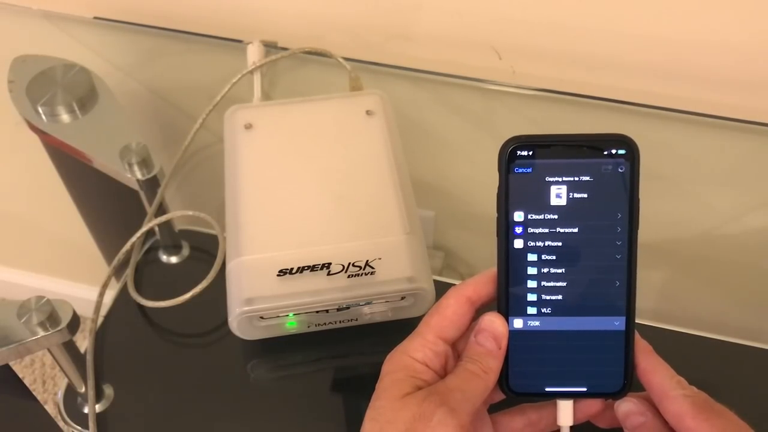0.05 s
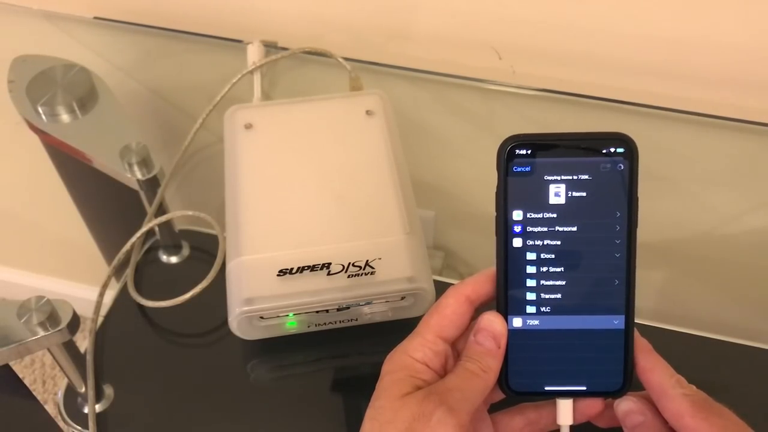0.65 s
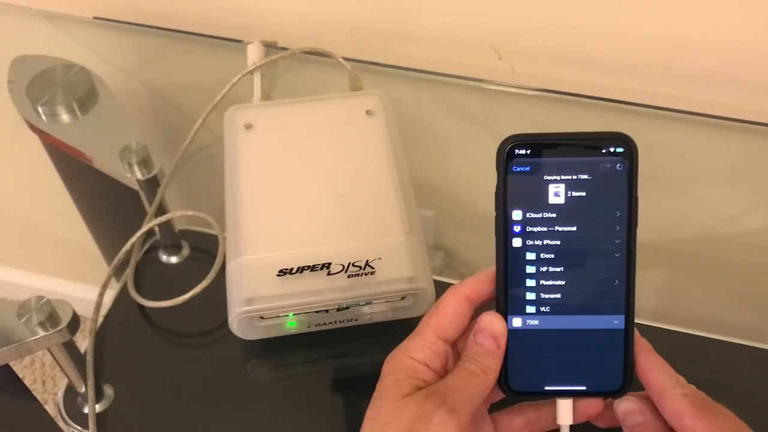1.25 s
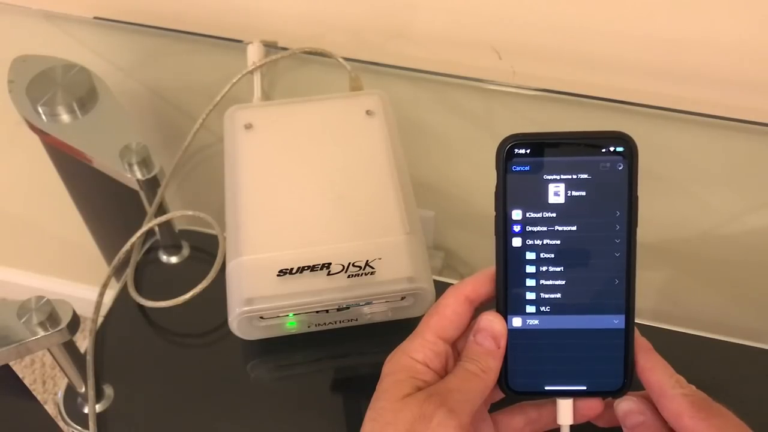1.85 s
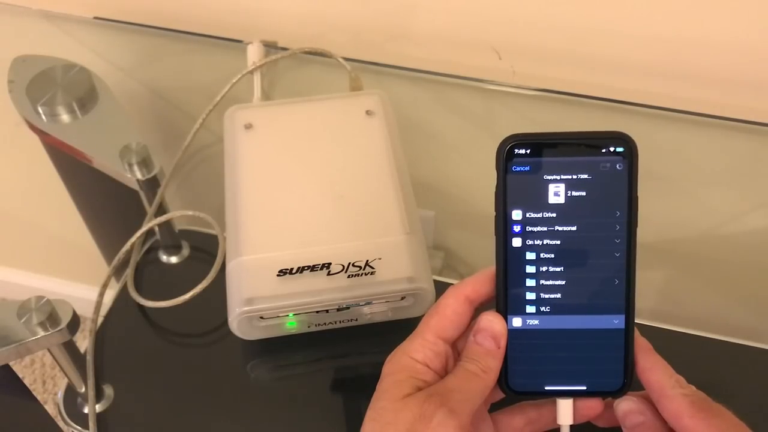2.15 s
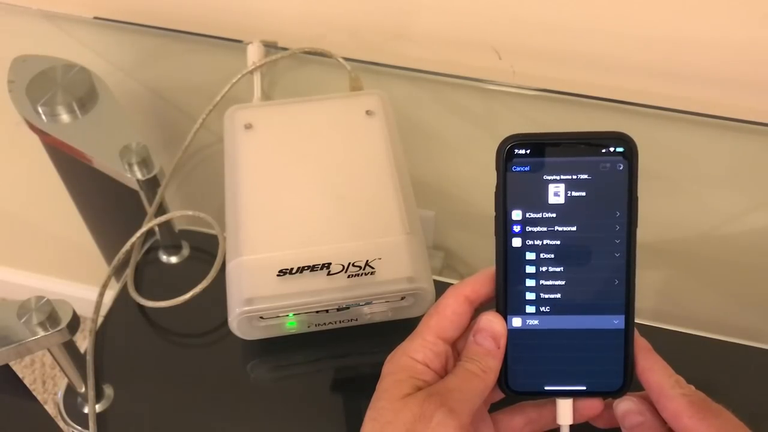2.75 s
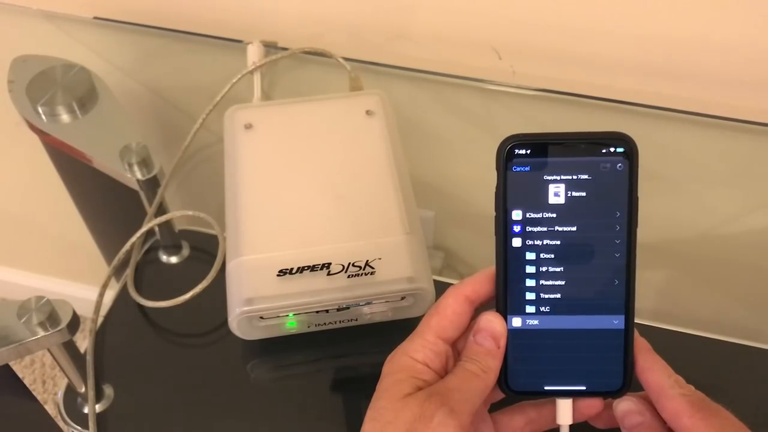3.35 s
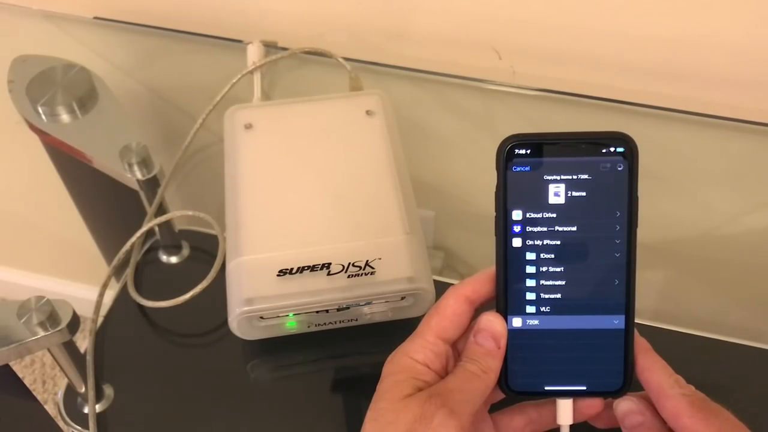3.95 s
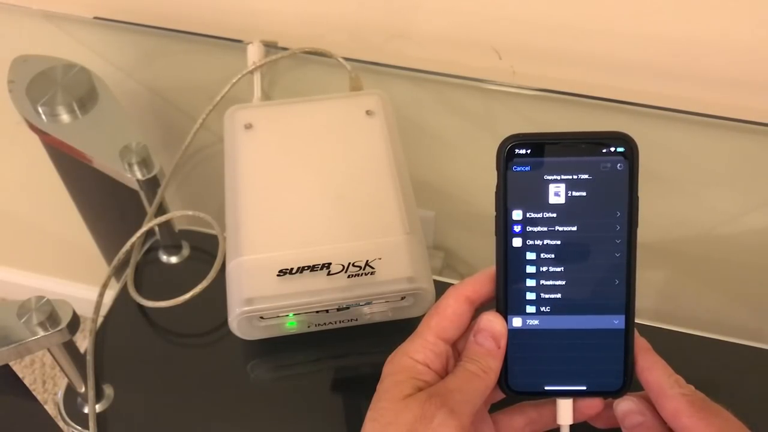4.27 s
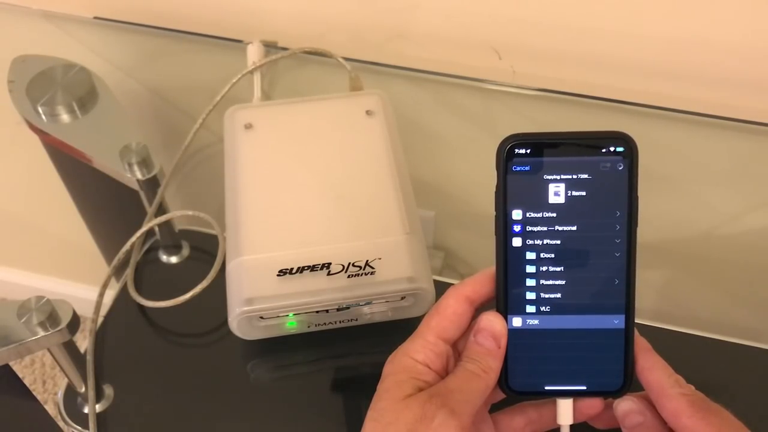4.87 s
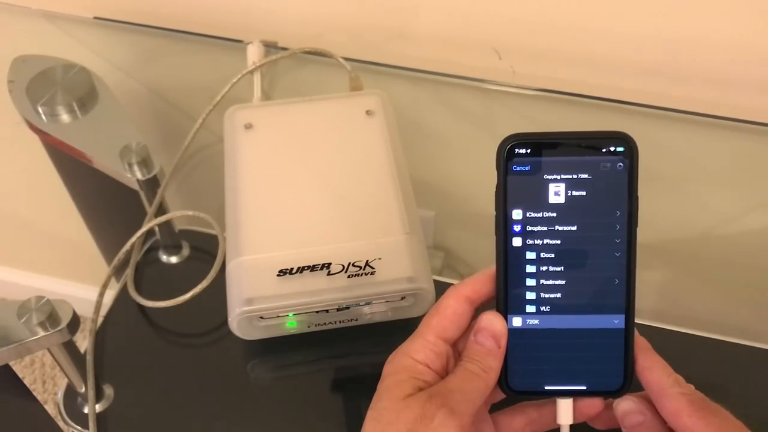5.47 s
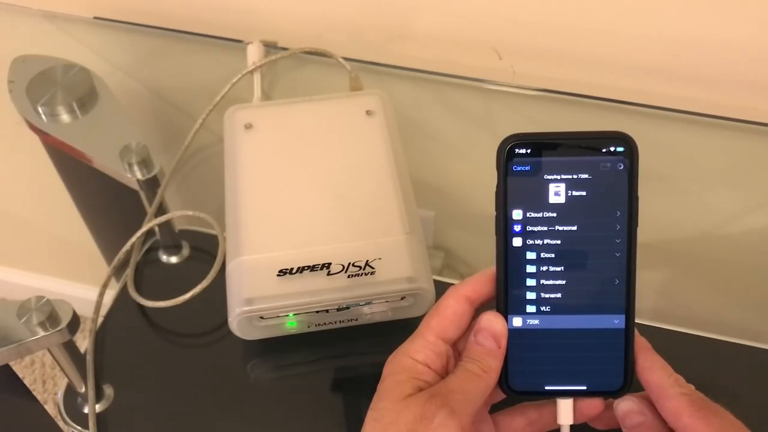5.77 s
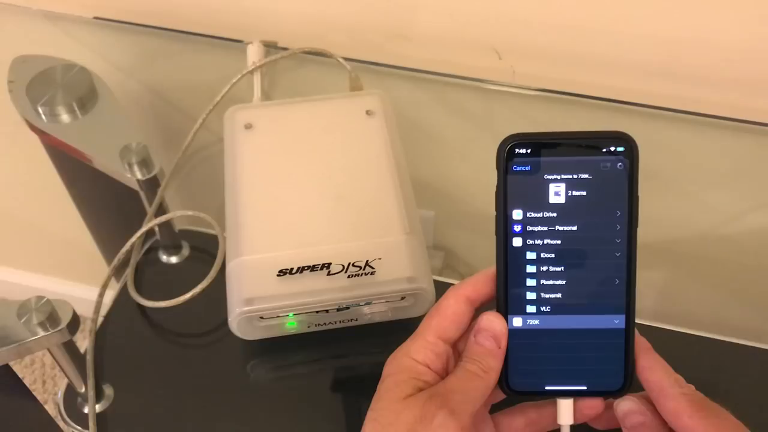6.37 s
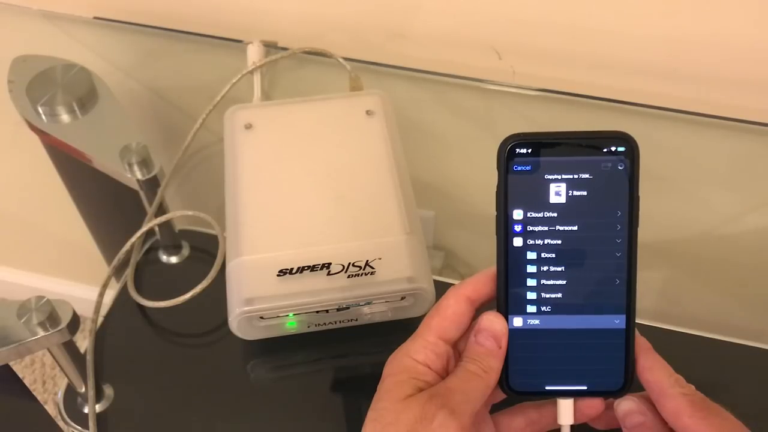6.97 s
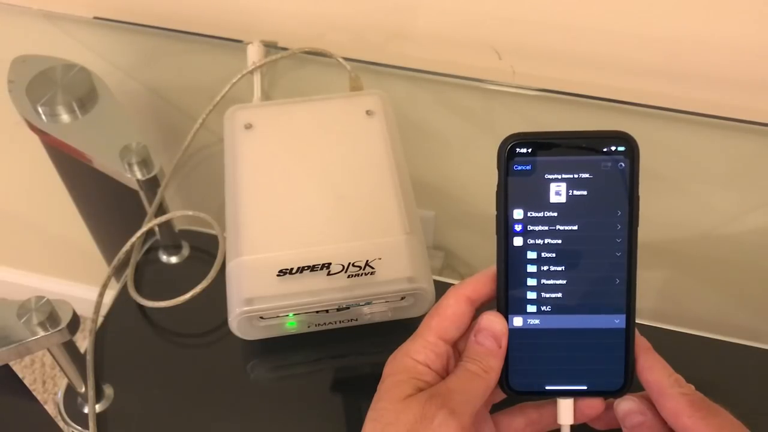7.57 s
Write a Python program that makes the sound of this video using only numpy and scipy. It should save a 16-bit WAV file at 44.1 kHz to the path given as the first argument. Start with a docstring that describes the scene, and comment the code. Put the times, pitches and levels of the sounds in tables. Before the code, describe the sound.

A floppy disk drive writes, its head stepping in quick, even scraping pulses over a whirring disk and low hum.

```python
"""Floppy drive writing

An external floppy drive writes to a disk on a desk in a small room. Low room rumble and mains hum
lie under thin motor tones and the frictional whirr of the spinning disk. The head carriage steps in
even runs, twelve times a second, broken by harder seeks and small corrections. Each move scrapes,
excites the modes of its metal frame and makes the servo sing; in some stretches fine ticks stand out."""
import sys
import numpy as np
from scipy import signal
from scipy.fft import rfft, irfft
from scipy.io import wavfile
from scipy.ndimage import uniform_filter1d

SR = 44100
rng = np.random.default_rng(int(sys.argv[2]) if len(sys.argv) > 2 else 0)


def store_wav(level_fs):
    """Save 16-bit WAV to argv[1]."""
    pcm = np.round(np.clip(np.atleast_2d(level_fs), -1, 1) * 32767)
    wavfile.write(sys.argv[1], SR, pcm.T.astype(np.int16))


N = 340452
T = np.arange(N) / SR
FREQ = np.maximum(np.arange(N // 2 + 1) * SR / N, 1)


def undb(db):
    """Amplitude ratio of a level in decibels."""
    return 10 ** (np.asarray(db) / 20)


def white_noise():
    """Gaussian noise with a flat spectral density of 0 dB per Hz."""
    return rng.standard_normal(N) * np.sqrt(SR / 2)


def drift(rate_hz):
    """Slow random modulation of unit variance: held values, smoothed twice."""
    hold = max(int(SR / rate_hz), 1)
    held = rng.standard_normal(N)[np.arange(N) // hold]
    smooth = uniform_filter1d(uniform_filter1d(held, hold), hold)
    return smooth / smooth.std()


def colour(x, spectrum, peaks):
    """Spectral shaping: a smooth envelope with Lorentzian resonance peaks on top."""
    hz, db = np.transpose(spectrum)
    gain_db = np.interp(np.log(FREQ), np.log(hz), db)
    gain_db += sum(lift / (1 + (2 * (FREQ - f) / width) ** 2) for f, width, lift in peaks)
    return irfft(rfft(x) * undb(gain_db), N)


def ring(x, modes, reach):
    """Modal superposition: each damped mode radiates through a band of relative width `reach`."""
    def band(f, width):
        return 1 / (1 + 1j * (FREQ ** 2 - f ** 2) / (FREQ * width))
    response = sum(undb(db) * band(f, width) * band(f, reach * f) for f, width, db in modes)
    return irfft(rfft(x) * response, N)


def reverberate(x, t60_s, wet_db):
    """Reverberation: dense reflections from desk and walls decay exponentially."""
    t = T[:SR // 3]
    tail = rng.standard_normal(len(t)) * undb(-60 * t / t60_s) * (t > .003)
    return x + undb(wet_db) * signal.fftconvolve(x, tail / np.linalg.norm(tail))[:N]


# Spectral envelope of the rumble: frequency_hz, density_db
RUMBLE_SPECTRUM = [(10, -112), (22, -99), (32, -88), (45, -82.5), (65, -69.5), (105, -65.5), (148, -69.5),
                   (185, -71), (240, -76.5), (330, -83.5), (520, -86.5), (900, -100), (2000, -125)]
# Standing waves of the room: frequency_hz, bandwidth_hz, lift_db
ROOM_RESONANCES = [(67, 23, 1.9), (98.4, 9.7, 7.2), (136.7, 9.8, 2.4), (165.8, 9.4, 11.8),
                   (229.7, 3.7, 6.8), (263, 5.6, 4.1), (319, 7.4, 3.4)]

def room_rumble():
    """Standing waves reinforce low broadband noise at the room's natural frequencies."""
    return colour(white_noise(), RUMBLE_SPECTRUM, ROOM_RESONANCES)


# Harmonics of the hum, from the fundamental up: level_db
HUM_HARMONICS = [-38, -66, -73.5]

def mains_hum(pitch_hz, waver_db):
    """Periodic vibration at twice the mains frequency gives a nearly steady harmonic series."""
    tones = sum(undb(db) * np.sin(2 * np.pi * (k * pitch_hz * T + rng.random()))
                for k, db in enumerate(HUM_HARMONICS, 1))
    return np.sqrt(2) * tones * undb(waver_db * drift(3.97))


# Partials of the motor: pitch_hz, level_db
MOTOR_PARTIALS = [(259.3, -62), (505, -78.5), (890, -77), (960, -78.5), (969, -74.5), (1019, -79),
                  (1297.5, -77.5), (1418, -89), (1589, -77.5), (1730, -79.5), (1801, -81.5), (1947, -75),
                  (2260, -91), (4544, -94)]

def motor_whine(wow, waver_db):
    """Frequency modulation: speed drift bends all partials together; each wavers in level alone."""
    shaft_time = T + wow * np.cumsum(drift(4)) / SR
    tones = sum(undb(db + waver_db * drift(6)) * np.sin(2 * np.pi * (hz * shaft_time + rng.random()))
                for hz, db in MOTOR_PARTIALS)
    return np.sqrt(2) * tones


# Spectral envelope of the disk rubbing in its jacket: frequency_hz, density_db
WHIRR_SPECTRUM = [(200, -105), (600, -91.5), (900, -93), (1450, -94), (1900, -95), (2150, -96.5),
                  (2800, -100), (3500, -105), (5600, -111), (8200, -112.5), (10500, -118.5),
                  (13500, -121.5)]
# Resonances of the case: frequency_hz, bandwidth_hz, lift_db
CASE_RESONANCES = [(564, 23, 9.1), (617, 23, 4.5), (730, 110, 2.8), (845, 12, 5.5), (912, 37, 6),
                   (974, 26, 3.4), (1130, 21, 2.9), (1298, 30, 5.6), (1605, 41, 8.6), (1740, 20, 6.2),
                   (1840, 21, 6.4), (1905, 30, 5), (2460, 86, 4.4), (2560, 56, 4.5), (3130, 51, 3.5),
                   (5120, 110, 2.5), (7160, 180, 6)]

def disk_whirr(turn_hz, swell_db, flicker_db):
    """Sliding friction: the disk brushes its liner, a little harder once in each turn."""
    rub_db = swell_db * np.sin(2 * np.pi * turn_hz * T) + flicker_db * drift(25)
    return colour(white_noise() * undb(rub_db), WHIRR_SPECTRUM, CASE_RESONANCES)


# Runs of even head steps: start_s, end_s, strength_db, step_length_s
STEP_RUNS = [(0.024, 0.89, 1, 0.025), (1.076, 1.37, 1, 0.055), (1.562, 1.69, 1.5, 0.053),
             (1.794, 2.17, 0, .045), (2.226, 3.43, 0.5, 0.037), (3.452, 3.91, 1.5, 0.056),
             (4.515, 4.72, 2, .075), (4.743, 5.20, 2, .072), (6.555, 6.70, 3.5, .08),
             (6.779, 7.06, 2, .072), (7.413, 7.70, 1.5, 0.073)]
# Single harder seeks: start_s, strength_db, length_s
SINGLE_SEEKS = [(0.111, 2.5, 0.02), (0.528, 2, .04), (0.765, 2.5, .033), (0.969, 3.5, 0.019),
                (1.386, 1.5, .022), (1.425, 1.5, .008), (1.524, 1, 0.007), (2.225, 2.5, .025),
                (2.646, 3.5, 0.044), (3.165, 4.5, 0.011), (3.926, 3.5, 0.06), (4.011, 1.5, .05),
                (4.194, 2, 0.06), (4.328, 1, 0.054), (4.403, 2, 0.0074), (4.681, 3.5, .075),
                (5.215, 2.5, 0.049), (5.346, 2.5, .018), (5.435, 0.5, .06), (5.615, 3, 0.024),
                (5.860, -0.5, 0.055), (6.025, 1.5, .022), (6.064, 1.5, 0.011), (6.243, 2.5, .012),
                (6.351, 3, 0.02), (6.428, 3.5, 0.032), (7.086, 2, .022), (7.22, 2.5, 0.024),
                (7.341, 3.5, 0.015), (7.619, 3.5, 0.024)]

def head_moves(period_s, scatter_db):
    """Periodic steps of slightly unequal strength, plus isolated seeks, as (start_s, db, length_s)."""
    deviations = rng.standard_normal(size=(len(STEP_RUNS), 40))
    steps = [(start, db + scatter_db * deviation, length)
             for (first, end, db, length), row in zip(STEP_RUNS, deviations)
             for start, deviation in zip(np.arange(first, end, period_s), row)]
    return steps + SINGLE_SEEKS


def corrections(rate_hz, strength_db, scatter_db, length_s):
    """A jittered pulse train: one brief move at a random moment in each slot of time."""
    slots = 400
    starts = (np.arange(slots) + rng.random(size=slots)) / rate_hz
    strengths = strength_db + scatter_db * rng.standard_normal(size=slots)
    return [(start, db, length_s) for start, db in zip(starts, strengths) if start < T[-1]]


def stroke(length_s, rise_s=.00053, coast_s=.061, brake_s=.0058):
    """Damped motion: the speed of one move rises sharply, decays, and is braked after length_s."""
    t = T[:SR // 5]
    rise = 1 - np.exp(-t / rise_s)
    return rise * np.exp(-t / coast_s - np.maximum(t - length_s, 0) / brake_s)


def carriage_motion(moves, creep_db, flutter_hz, flutter_db):
    """Kinematics: a fluttering speed set by the fastest move or by creep, and an impulse at each start."""
    speed = np.full(N + SR, undb(creep_db))
    jerks = np.zeros(N + SR)
    for start_s, db, length_s in moves:
        onset = int(start_s * SR)
        move_speed = undb(db) * stroke(length_s)
        span = slice(onset, onset + len(move_speed))
        speed[span] = np.maximum(speed[span], move_speed)
        jerks[onset] = undb(db)
    flutter = undb(flutter_db * np.cos(2 * np.pi * flutter_hz * T))
    return speed[:N] * flutter, jerks[:N]


# Stretches of stronger ticking: start_s, end_s, gain_db
TICK_SPELLS = [(1.17, 1.70, -3.5), (2.10, 2.76, -3.5), (3.70, 4.10, -2.5), (4.95, 5.53, -2),
               (6.87, 7.9, -2.5)]
# High modes of the head: frequency_hz, bandwidth_hz, gain_db
HEAD_MODES = [(6520, 150, -2), (8100, 65, 3), (8200, 130, -3), (9290, 170, 1.5), (9630, 120, -5)]

def head_ticks(speed, gain_db, idle, tick_hz, decay_periods, rest_db=-14.5, fade_s=.1):
    """Pulsed excitation: fine, even noise bursts ring the head, more strongly while it travels."""
    spell_db = rest_db
    for start, end, db in TICK_SPELLS:
        inside_s = np.minimum(T - start, end - T)
        spell_db += (db - rest_db) * np.clip(inside_s / fade_s + .5, 0, 1)
    ticks = np.exp(-(tick_hz * T % 1) / decay_periods)
    force = (speed + idle) * ticks * undb(gain_db + spell_db)
    return ring(white_noise() * force, HEAD_MODES, reach=.12)


def servo_tone(speed, gain_db, exponent, waver_db, pitch_hz, wander_hz):
    """Servo hunting: a tone wanders about one pitch, its amplitude a power law of the speed."""
    amplitude = speed ** exponent * undb(gain_db + waver_db * drift(30))
    phase = 2 * np.pi * np.cumsum(pitch_hz + wander_hz * drift(70)) / SR
    return amplitude * np.sqrt(2) * np.sin(phase)


# Modes of the carriage's metal frame: frequency_hz, bandwidth_hz, gain_db
CARRIAGE_MODES = [(667, 42, -22), (1185, 120, -11), (1577, 60, -7.5), (1706, 53, -6.5), (1790, 73, -10),
                  (2398, 49, -6.5), (2595, 99, -14.5), (2676, 59, -6.5), (2755, 47, -11.5), (2880, 40, -13),
                  (3123, 46, -10), (3400, 44, -16), (3480, 44, -16), (3756, 72, -19), (6560, 170, -27.5),
                  (8200, 310, -33), (8600, 160, -26), (9050, 83, -29), (9170, 120, -27), (9800, 120, -28.5),
                  (11670, 120, -31)]

def carriage_scrape(speed, jerks, scrape_db, jerk_db, grain_db):
    """Forced vibration: starting impulses and gritty friction, growing with speed, ring the frame."""
    friction = white_noise() * undb(grain_db * drift(900))
    friction *= np.sqrt(SR / 2) / friction.std()
    force = undb(scrape_db) * speed * friction + undb(jerk_db) * jerks
    return ring(force, CARRIAGE_MODES, reach=.29)


def scene():
    """Superposition in one channel: the nearby drive and its reflections over the room's rumble."""
    moves = head_moves(period_s=.0832, scatter_db=1.0)
    moves += corrections(rate_hz=9, strength_db=-.5, scatter_db=1.5, length_s=.0097)
    speed, jerks = carriage_motion(moves, creep_db=-18.5, flutter_hz=29.485, flutter_db=1.45)
    head = carriage_scrape(speed, jerks, scrape_db=-80.5, jerk_db=-19.5, grain_db=1.5)
    head += servo_tone(speed, gain_db=-62.5, exponent=1.24, waver_db=1.5, pitch_hz=2457, wander_hz=12)
    head += head_ticks(speed, gain_db=-96.7, idle=.12, tick_hz=47.8, decay_periods=.46)
    whirr = disk_whirr(turn_hz=11.0, swell_db=.13, flicker_db=.7)
    drive = reverberate(head, t60_s=.14, wet_db=-11.0) + reverberate(whirr, t60_s=.23, wet_db=-10.5)
    tones = mains_hum(pitch_hz=119.56, waver_db=.76) + motor_whine(wow=.0005, waver_db=1.5)
    return (drive + tones + room_rumble())[None]


def record(dry):
    """Band limiting: a steep elliptic low-pass removes the highest treble."""
    cutoff_hz = 15730
    return signal.sosfilt(signal.ellip(12, .1, 80, cutoff_hz, fs=SR, output="sos"), dry)


dry = scene()
out = record(dry)
store_wav(out)
```